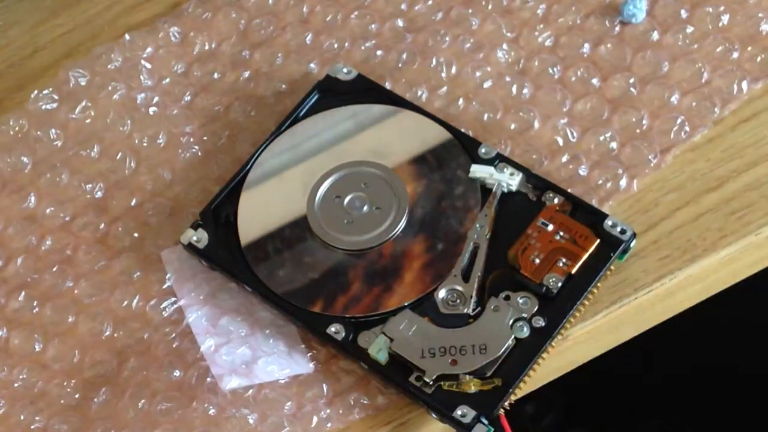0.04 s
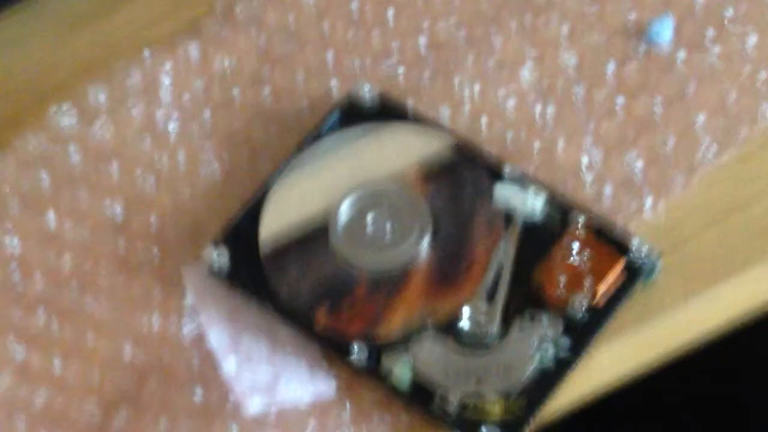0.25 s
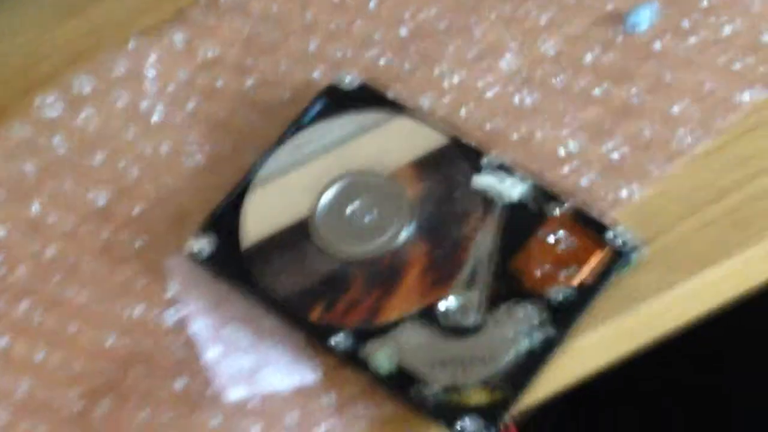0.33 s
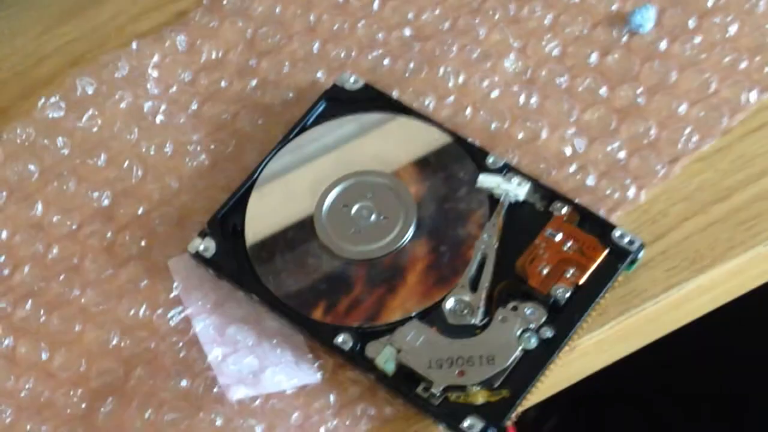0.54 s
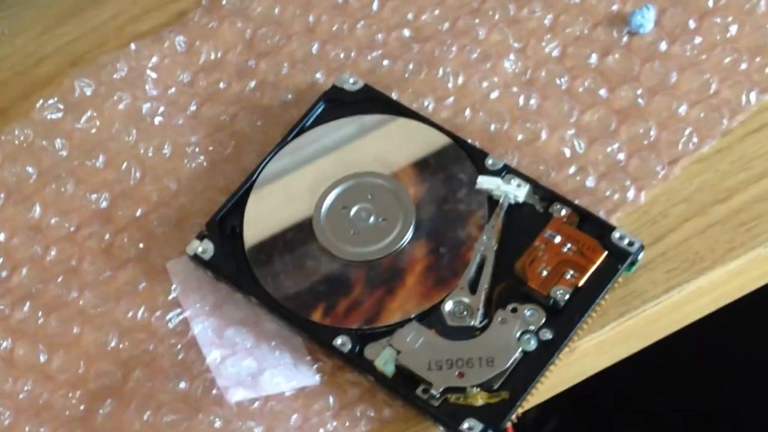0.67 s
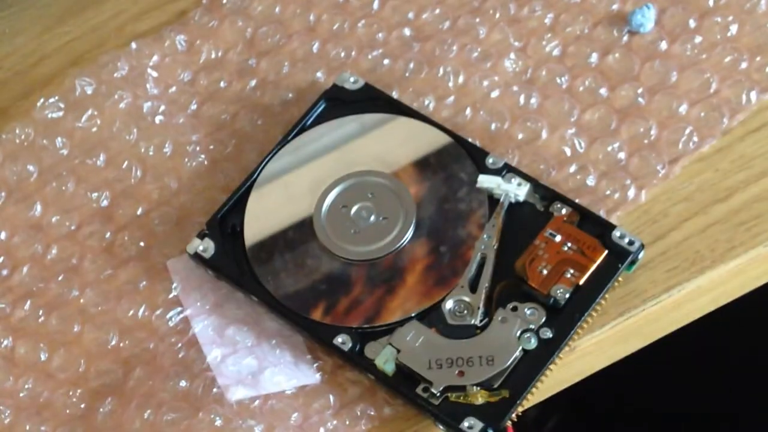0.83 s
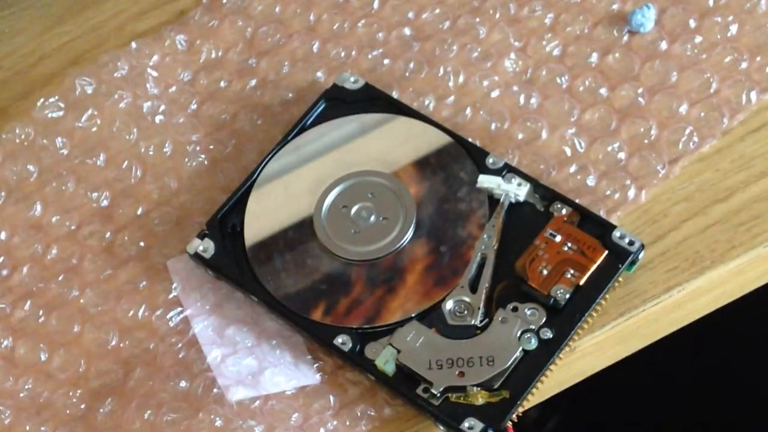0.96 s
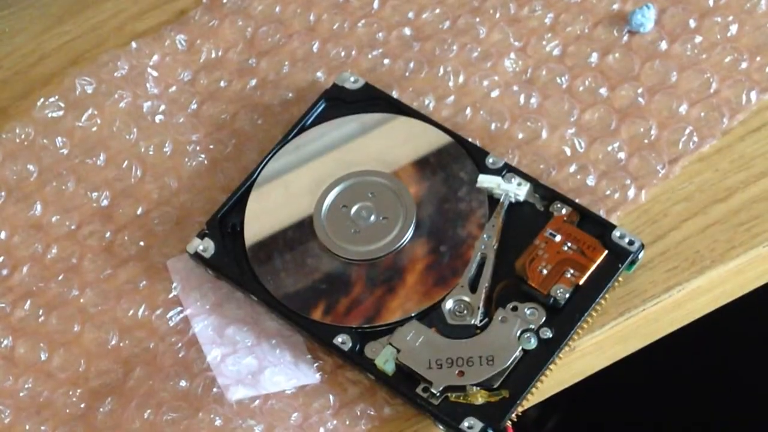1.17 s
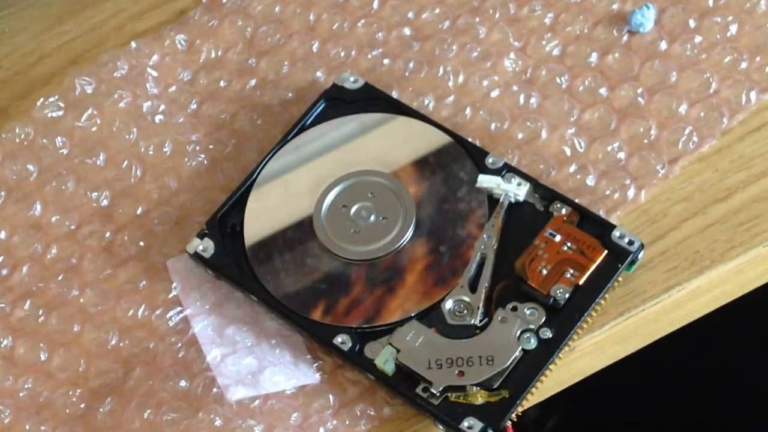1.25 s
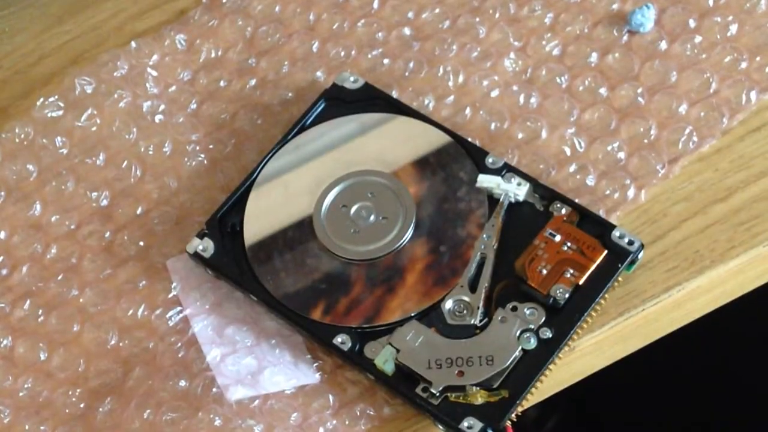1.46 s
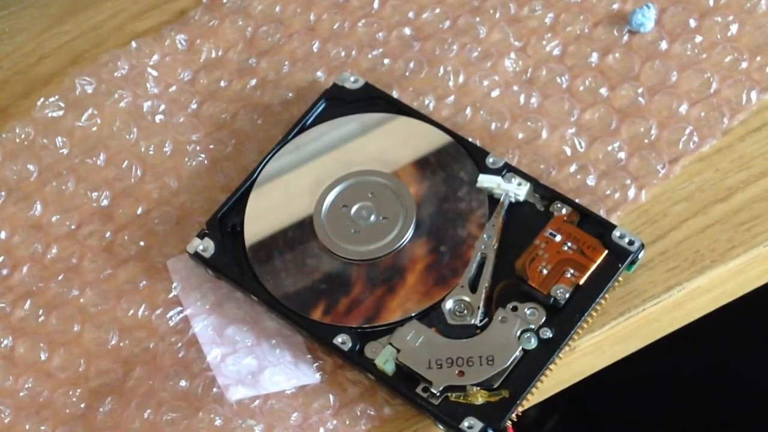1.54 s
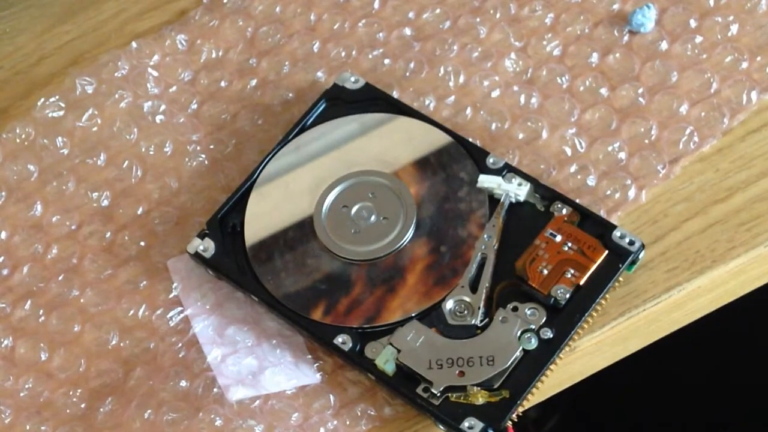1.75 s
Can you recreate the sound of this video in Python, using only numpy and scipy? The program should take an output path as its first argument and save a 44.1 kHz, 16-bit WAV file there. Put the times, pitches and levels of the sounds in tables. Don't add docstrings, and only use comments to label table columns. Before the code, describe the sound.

Brief clicking rattle of a loose metal hard drive knocked on a wooden desk, then quiet room.

```python
import sys
import numpy as np
from scipy import signal
from scipy.fft import rfft, irfft
from scipy.io import wavfile
from scipy.ndimage import uniform_filter1d

SR = 44100
rng = np.random.default_rng(int(sys.argv[2]) if len(sys.argv) > 2 else 0)


def log_audio(samples):
    frames = np.atleast_2d(samples).T
    limited = np.clip(frames, -1, 1)
    pcm = np.round(limited * 32767).astype(np.int16)
    wavfile.write(sys.argv[1], SR, pcm)


def makeup_ratio(level_db):
    decades = np.asarray(level_db, float) / 20
    return 10 ** decades


N = 79380


def unit(x):
    return x / np.sqrt(np.mean(x ** 2) + 1e-30)


def resonance(x, hz, width_hz):
    return signal.lfilter(*signal.iirpeak(min(hz, 0.45 * SR), hz / width_hz, fs=SR), x)


def wide(x, lo_hz, hi_hz, order=2):
    edges = [lo_hz, min(hi_hz, 0.45 * SR)]
    return signal.sosfilt(signal.butter(order, edges, "band", fs=SR, output="sos"), x)


def walk(rate_hz, size):
    hold = int(SR / rate_hz)
    levels = np.repeat(rng.standard_normal(size // hold + 2), hold)
    smooth = uniform_filter1d(uniform_filter1d(levels, hold), hold)
    return unit(smooth[:size])


def add(out, start_s, x):
    i = int(start_s * SR)
    out[i:i + len(x)] += x[:N - i]


def time_axis(length_s):
    return np.arange(int(SR * length_s)) / SR


def swings(table, attack_s, release_s, sag_db_s, rough_db):
    out, t = np.zeros(N), time_axis(0.25)
    for start_s, length_s, db, hz in table:
        rise = np.clip(t / attack_s, 0, 1)
        damping = np.exp(-np.clip(t - length_s, 0, 1) / release_s)
        wobble_db = rough_db * walk(hz / 12, size=len(t))
        tone = np.sin(2 * np.pi * hz * t)
        add(out, start_s, makeup_ratio(db + sag_db_s * t + wobble_db) * rise * damping * tone)
    return out


# (frequency [Hz], density [dB per Hz])
ROOM_SPECTRUM = [(25, -28.5), (60, -8), (130, -9), (400, -7), (700, -11.5), (1100, -15.5), (4000, -17),
                 (15500, -20)]


def room():
    f = np.fft.rfftfreq(N, 1 / SR)
    hz, db = np.array(ROOM_SPECTRUM).T
    density_db = np.interp(np.log(f + 1), np.log(hz), db)
    noise = rfft(rng.standard_normal(N)) * makeup_ratio(density_db) * (f > 20)
    low = 1 / (1 + (f / 900) ** 2)
    rumble = irfft(noise * low, N) * makeup_ratio(0.06 * walk(3.2, size=N))
    hiss = irfft(noise * (1 - low), N)
    phase = 2 * np.pi * 116.06 * np.arange(N) / SR + 0.56 * walk(8, size=N)
    hum = np.sqrt(2) * np.sin(phase) * makeup_ratio(-79 + 2.5 * walk(9.14, size=N))
    drone = makeup_ratio(-83.5) * unit(resonance(rng.standard_normal(N), 400.6, 10.7))
    return makeup_ratio(-67) * unit(rumble + hiss) + hum + drone


# (start [s], length [s], level [dB], pitch [Hz])
DESK_SWAYS = [(.2214, 0.04, -41.5, 71.1), (.2655, 0.0305, -36, 73.4), (.3090, .010, -53.5, 80),
              (.3335, 0.0202, -38.5, 66.6), (.3810, 0.052, -43.5, 68.4), (.4245, 0.0219, -35.5, 68),
              (.4555, 0.043, -42.5, 64.7), (.5580, 0.0457, -57, 72.7), (.6550, 0.0317, -66, 69.7),
              (.7000, 0.045, -68, 69.3), (.7550, 0.0326, -69.5, 69.6), (.8200, 0.0365, -75, 88.3)]


def desk_rocking():
    return swings(DESK_SWAYS, attack_s=0.00344, release_s=0.0057, sag_db_s=-7, rough_db=0)


# (start [s], length [s], level [dB], pitch [Hz])
DESK_BUMPS = [
    (.2110, 0.0148, -39.5, 104.5),
    (.2700, 0.018, -44.5, 126.4),
    (.3245, 0.0168, -43, 113.7),
    (.4165, 0.028, -38, 122.4),
    (.4625, 0.033, -48, 120.9),
    (.5150, 0.0396, -60, 105.8),
    (.5950, 0.0135, -61, 108.8),
]


def desk_bumps():
    return swings(DESK_BUMPS, attack_s=0.00164, release_s=0.0032, sag_db_s=-127.5, rough_db=0)


# (start [s], length [s], level [dB], pitch [Hz])
PANEL_HUMS = [
    (.3150, 0.0808, -46.5, 309),
    (0.39, 0.033, -64.5, 310),
    (.2600, 0.0245, -54, 178.7),
    (.2500, 0.081, -60, 260),
]


def panel_hum():
    return swings(PANEL_HUMS, attack_s=0.0137, release_s=0.0137, sag_db_s=-26, rough_db=4.33)


# (start [s], level [dB], centre [Hz], T60 [s])
DESK_KNOCKS = [
    (.2085, -35.5, 606, 0.092),
    (.2300, -39.5, 450, 0.306),
    (.2680, -39.5, 507, 0.274),
    (.3300, -33, 390, 0.192),
    (.3600, -34.5, 483, 0.16),
    (.3740, -37.5, 534, 0.088),
    (.4050, -44.5, 600, 0.195),
    (.4300, -45.5, 504, 0.319),
]


def knocks():
    out, t = np.zeros(N), time_axis(0.25)
    for start_s, db, hz, t60 in DESK_KNOCKS:
        decay = makeup_ratio(db - 60 * t / t60) * np.clip(t / 0.00124, 0, 1)
        add(out, start_s, wide(rng.standard_normal(len(t)) * decay, hz / 2.965, hz * 1.584))
    return out


# (frequency [Hz], level [dB], T60 [s])
CASE_MODES = [(906.6, -7, 0.157), (1713, -8, 0.088), (2195, -37, 0.45), (2682.4, -5, 0.098),
              (2982, -16, 0.45), (3271, -13.5, 0.12), (3802, -8.5, 0.153), (4595, -4.5, 0.037),
              (4676, -6.5, 0.23), (5179, -2, 0.049), (6064, -3.5, 0.036), (6800, -29.5, 0.12),
              (6950, -11.5, 0.11), (8900, -43, 0.18)]


def case(x):
    damping = 0.28
    shares = makeup_ratio(3.5 * rng.standard_normal(len(CASE_MODES)))
    ring = np.zeros(len(x))
    for share, (hz, db, t60) in zip(shares, CASE_MODES):
        ring += share * makeup_ratio(db) * np.sqrt(t60) * resonance(x, hz, 2.63 / (t60 * damping))
    return ring


# (start [s], level [dB], centre [Hz], T60 [s], sheen [dB])
RATTLE_BURSTS = [(0.2008, -34.5, 4450, 0.065, -33.5), (0.2081, -28, 5520, 0.0459, -20.5),
                 (0.2148, -31.5, 4010, 0.138, -31.5), (0.241, -48.5, 4500, 0.165, -27.5),
                 (0.266, -37, 2370, 0.113, -26), (.2900, -47.5, 2543, 0.678, -19),
                 (0.3338, -37.5, 3750, 0.0435, -14.5), (.3395, -37.5, 3080, 0.068, -21.5),
                 (.3590, -33.5, 3990, 0.1297, -14), (0.3712, -37, 2890, 0.0684, -16),
                 (.4040, -47.5, 2990, 0.211, -17), (.4440, -53.5, 4540, 0.07, -15)]


def rattle():
    grains_per_s, edge_hz = 5000, 7800
    out, t = np.zeros(N), time_axis(0.25)
    for start_s, db, hz, t60, sheen_db in RATTLE_BURSTS:
        hit = rng.random(len(t)) < grains_per_s / SR
        strength = makeup_ratio(1.8 * rng.exponential(size=len(t)))
        z = rng.standard_normal(len(t))
        grains = unit(hit * strength * np.sign(z) + 0.163 * z)
        fade = makeup_ratio(-60 * t / t60) * np.clip(t / 0.00058, 0, 1)
        x = grains * fade
        ring = case(x)
        struck = x + makeup_ratio(-6) * ring * np.std(x) / np.std(ring)
        metal = wide(wide(struck, hz / 2.236, hz * 0.945, order=1), 231, edge_hz, order=4)
        sheen = makeup_ratio(sheen_db) * wide(grains * fade ** 1.6, edge_hz, 16400)
        body = makeup_ratio(-2) * wide(x, 887 / 1.9, 887 * 1.223)
        add(out, start_s, makeup_ratio(db) * (metal + sheen + body))
    return out


# (time [s], peak level [dB], centre [Hz])
CONTACT_TICKS = [(0.2081, -26, 6100), (0.2161, -29.5, 5200), (0.2553, -46.5, 4800), (.2830, -35.5, 6500),
                 (0.3338, -32.5, 3720), (0.3599, -30, 3570), (0.4303, -33.5, 3630), (.4449, -34, 3790),
                 (0.4605, -46.5, 4000), (0.507, -56, 2520), (.5320, -56.5, 5000)]


def ticks():
    out, t = np.zeros(N), time_axis(0.05)
    for time_s, db, hz in CONTACT_TICKS:
        tail = makeup_ratio(-18 - 60 * t / 0.003) * rng.standard_normal(len(t))
        crack = tail - (t == 0)
        x = wide(wide(crack, hz / 3.28, hz * 1.096, order=1), 443, 10750, order=3)
        add(out, time_s, makeup_ratio(db) * x / np.abs(x).max())
    return out


# (start [s], peak level [dB], centre [Hz], T60 [s])
ARM_SCRAPES = [(.2085, -32, 5200, .10), (.2090, -35, 6900, .12), (.2100, -42, 930, .10),
               (.2120, -40, 2700, .11), (.2855, -50, 2100, .04), (.3340, -40, 4200, .02),
               (.4100, -50, 1800, .06), (.4460, -53, 5500, .09), (.4640, -59, 5450, .08),
               (.5105, -55, 5000, .04), (.5220, -62, 5300, .05)]


def scrapes():
    spread = 1.09
    out, t = np.zeros(N), time_axis(0.2)
    for start_s, peak_db, hz, t60 in ARM_SCRAPES:
        rough = unit(wide(rng.standard_normal(len(t)), hz / spread, hz * spread))
        fade = makeup_ratio(peak_db - 6 - 60 * t / t60) * np.clip(t / 0.0015, 0, 1)
        add(out, start_s, rough * fade)
    return out


# (start [s], length [s], level [dB], pitch [Hz])
ARM_SQUEAKS = [
    (.2018, .0088, -30.5, 1712),
    (.2010, .006, -48, 6300),
    (.2110, .010, -42, 780),
    (.3335, .0010, -33, 3950),
    (.4335, .005, -56, 4850),
    (.4402, .003, -53, 5600),
]


def squeaks():
    return swings(ARM_SQUEAKS, attack_s=0.0018, release_s=0.0012, sag_db_s=-69, rough_db=2.5)


def scene():
    desk = wide(desk_rocking() + desk_bumps() + panel_hum(), 48.1, 2000) + knocks()
    drive = rattle() + ticks() + scrapes() + squeaks()
    return (room() + desk + drive)[None]


def roll_off(x):
    return signal.sosfilt(signal.butter(12, 15690, fs=SR, output="sos"), x)


def record(dry):
    low_pass = signal.ellip(8, 0.2, 70, 15600, fs=SR, output="sos")
    return roll_off(signal.sosfilt(low_pass, dry))


dry = scene()
out = record(dry)
log_audio(out)
```